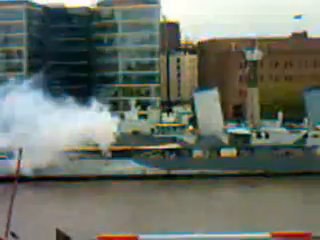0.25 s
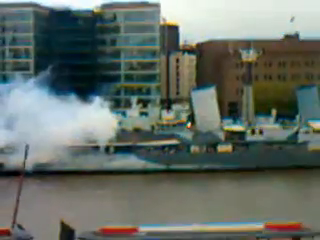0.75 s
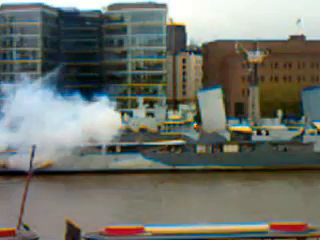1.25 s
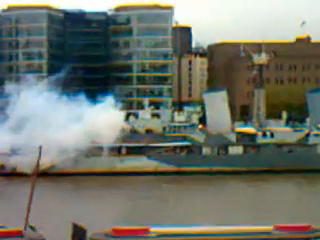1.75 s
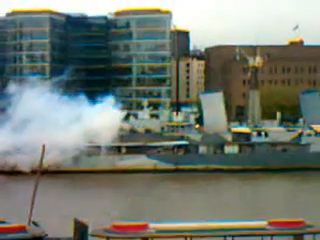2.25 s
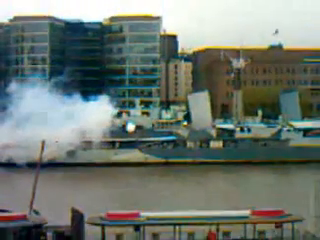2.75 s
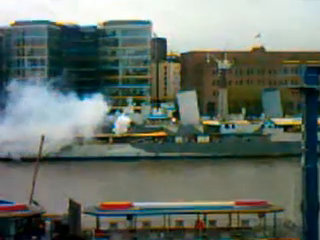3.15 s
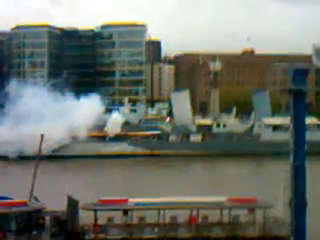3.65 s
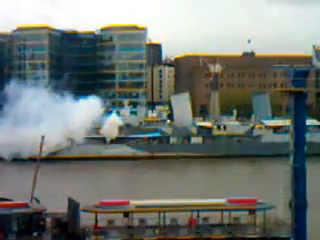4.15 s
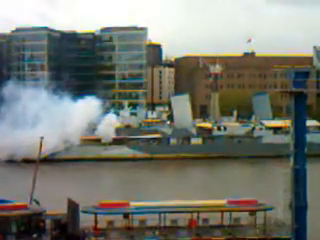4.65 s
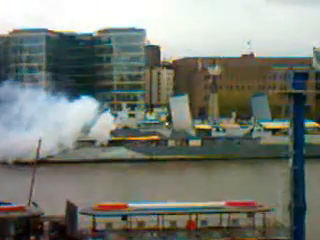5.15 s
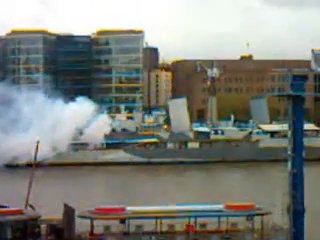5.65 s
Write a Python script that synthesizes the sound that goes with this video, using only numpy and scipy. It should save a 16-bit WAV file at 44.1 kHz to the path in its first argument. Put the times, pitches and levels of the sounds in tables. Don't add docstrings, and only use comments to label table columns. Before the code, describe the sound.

Two huge cannon booms, about three seconds apart, overload a small microphone and roll and crackle away between city buildings across a river.

```python
import sys
import numpy as np
from scipy import signal
from scipy.io import wavfile
from scipy.ndimage import uniform_filter1d, minimum_filter1d

SR = 44100
rng = np.random.default_rng(int(sys.argv[2]) if len(sys.argv) > 2 else 0)


def generate_wav(sig):
    pcm = np.round(np.clip(np.atleast_2d(sig).T, -1, 1) * 32767).astype(np.int16)
    wavfile.write(sys.argv[1], SR, pcm)


def voltage_ratio(decibels):
    exponent = np.asarray(decibels, float) / 20
    return 10 ** exponent


N = 260190


def unit(x):
    return x / np.sqrt(np.mean(x ** 2))


def resonate(x, hz, width_hz):
    return signal.lfilter(*signal.iirpeak(hz, hz / width_hz, fs=SR), x)


def dull(x, hz):
    return signal.sosfilt(signal.butter(6, hz, fs=SR, output="sos"), x)


def curve(rows, column):
    rows = np.asarray(rows)
    return np.interp(np.arange(N) / SR, rows[:, 0], rows[:, column])


# [t/s, level/dB]
TRAFFIC_HISS = [(0, -56.5), (.15, -65), (.3, -71), (.6, -77), (2.75, -71), (2.9, -64), (3.3, -69),
                (3.45, -63), (3.6, -66), (5.2, -68.5), (5.45, -72), (5.9, -68.5)]


def city_hiss():
    noise = resonate(rng.standard_normal(N), 2600, 1600)
    return voltage_ratio(curve(TRAFFIC_HISS, column=1)) * unit(dull(noise, 3400))


# [t/s, f/Hz, peak level/dB, rise/s, t60/s]
KNOCKS = [(2.1022, 470, -9, .0016, .013), (2.1025, 1470, -18.5, 0.0017, .015),
          (2.1028, 760, -25, .001, .012), (2.1092, 399, -10.5, 0.0066, 0.018),
          (2.111, 717, -26.5, .003, 0.051), (2.519, 171.4, -19.5, .0015, 0.23),
          (2.824, 380, -32, 0.0011, 0.042), (3.3874, 2080, -18, 0.00045, .011),
          (4.737, 350, -34, 0.0012, .008), (5.487, 109, -30, 0.0081, .2), (5.503, 259, -23, 0.0033, .069),
          (5.535, 240.7, -24, .0028, .22)]


def knocks():
    out = np.zeros(N)
    t = np.arange(SR // 4) / SR
    for start, hz, db, rise, t60 in KNOCKS:
        attack = np.sin(np.pi / 2 * np.clip(t / rise, 0, 1)) ** 2
        decay = voltage_ratio(-60 * np.maximum(t - rise, 0) / t60)
        out[int(start * SR):][:len(t)] += voltage_ratio(db) * attack * decay * np.sin(2 * np.pi * hz * t)
    return out


def add_burst(out, start, hz, db, width_hz, t60, shock):
    t = np.arange(SR // 4) / SR
    push = rng.standard_normal(len(t))
    push[0] = shock
    push = push * voltage_ratio(-60 * t / t60)
    burst = resonate(resonate(push, hz, width_hz), hz, 2 * width_hz)
    out[int(start * SR):][:len(t)] += voltage_ratio(db) * burst / np.abs(burst).max()


# [t/s, f/Hz, peak level/dB, width/Hz, t60/s]
SNAPS = [(.6235, 2500, -17, 1800, .12), (.647, 1470, -11, 460, 0.15), (2.1025, 700, -22.5, 298, 0.068),
         (2.8232, 1400, -15.5, 1300, .068), (2.8236, 2620, -24, 1100, .04),
         (2.8252, 3650, -17.5, 610, .013), (2.8352, 1500, -31, 900, .16), (3.3875, 1980, -22.5, 460, 0.061),
         (3.389, 790, -21, 790, 0.066), (3.6103, 1500, -24, 2000, 0.056), (3.638, 1600, -15, 458, .1),
         (3.617, 2000, -14, 2000, .055), (3.968, 1400, -20.5, 250, .07), (4.06, 2900, -42, 1200, .4),
         (3.39, 3420, -34, 159, 0.042)]


def snaps():
    out = np.zeros(N)
    for row in SNAPS:
        add_burst(out, *row, shock=6.5)
    return out


# [delay t/s, f/Hz, peak level/dB]
RINGING_FRONTS = [
    (.586, 1130, -18),
    (.585, 1700, -25),
    (1.833, 1650, -35),
]
# [t/s, f/Hz, peak level/dB]
BLIPS = [(3.388, 240, -25), (4.345, 1300, -30), (4.905, 1435, -41), (5.09, 1300, -40), (5.207, 1330, -38),
         (5.469, 1550, -32), (5.487, 1290, -28.5), (5.485, 510, -26.5)]


def blips():
    out = np.zeros(N)
    rung = [(shot + delay, hz, db) for shot in SHOTS_S[1:] for delay, hz, db in RINGING_FRONTS]
    for row in rung + BLIPS:
        add_burst(out, *row, width_hz=150, t60=.085, shock=6.)
    return out


SHOTS_S = [
    -2.366,
    .622,
    3.611,
]
# [delay t/s, level/dB, bass over crack/dB, t60/s]
FRONTS = [(0.0, -14.5, 14, 0.17), (0.008, -7, -2.5, 0.47), (0.05, -23, 36, 0.37), (0.164, -23, 29.5, 0.21),
          (0.195, -29.5, 13, 1.49), (0.251, -36.5, 27, 0.52), (0.344, -30.5, 9.5, 1.48),
          (0.468, -44, 27.5, 0.62), (0.572, -25.5, 7, 0.4), (0.67, -40.5, 14.5, 1.01),
          (0.756, -34, -8.5, 0.91), (0.943, -39.5, -0.7, 1.21), (1.05, -37.5, 16, 0.6),
          (1.094, -31.5, 5, 0.51), (1.168, -33, -1, 0.36), (1.28, -35, -9.5, 0.47),
          (1.406, -38.5, -10, 0.32), (1.466, -33.5, -10, 0.24), (1.569, -50.5, 14, 1.06),
          (1.834, -28, 9, 0.17), (1.86, -37, 16.5, 0.68), (1.998, -72.2, 31, 1.57),
          (2.333, -52, 21.5, 0.51), (2.537, -63, -2.7, 2.4)]
# [t/s, level/dB, bass over crack/dB, t60/s]
STRAYS = [(0.013, -57.5, 22.5, 1.6), (0.056, -63, 23.2, 1.52), (0.878, -32, 21, 1.37),
          (1.269, -38, 12, 2.4), (1.398, -39.5, 27.5, 0.55), (1.622, -43, 29.5, 0.44),
          (1.718, -58, 29.5, 4.6), (1.881, -31, 19, 0.33), (1.958, -39, 17, 0.67),
          (2.045, -32.5, 13.5, 0.6), (2.192, -25.5, 2.2, 0.27), (2.288, -47.5, 29, 0.31),
          (2.64, -57.5, 26, 1.2), (2.833, -51, 18.5, 1.7), (3.042, -65, 37.5, 0.44),
          (3.189, -67.2, 37.5, 0.53), (3.265, -60.5, 36, 0.18), (3.422, -60, 20.0, 3.4),
          (3.961, -24, 18.5, 0.18), (4.334, -52, 35, 0.7), (4.399, -39.5, 27, 0.25),
          (4.52, -49.0, 30.5, 0.52), (4.721, -45.7, 31.5, 0.16), (4.763, -67.5, 37.5, 1.89),
          (5.121, -63.6, 36.8, 0.33), (5.478, -32.5, 11.5, 0.2), (5.681, -62.3, 38, 0.13),
          (5.762, -55.5, 18, 1.2)]
PARTS = {"boom": (0.14, 1.0184, 0.02, 0.7559, -51.5), "body": (-1.53, 0.3956, 0.02, 1.0464, -66.5),
         "crack": (0.08, .01, 0.0186, 1.01, -80.5), "edge": (-8.6, 0.3459, .018, .8, -85.5)}
AIR_LOSS_DB, AIR_LOSS_S, AIR_KNEE = -21.5, .66, 2.4


def roll(part):
    offset_db, bass_share, rise, stretch, floor_db = PARTS[part]
    t = np.arange(0, N, 32) / SR
    answers = [(shot + delay, *rest) for shot in SHOTS_S for delay, *rest in FRONTS]
    start, db, bass_db, t60 = np.array(answers + STRAYS).T[:, :, None]
    since = np.maximum(t - start, 0)
    level_db = db + offset_db + bass_share * bass_db - 60 * since / (stretch * t60)
    gain = (1 - np.exp(-since / rise)) * voltage_ratio(level_db)
    gain = np.sqrt(np.sum(gain ** 2, axis=0))
    if part == "edge":
        since_shot = t - np.array(SHOTS_S)[np.searchsorted(SHOTS_S, t) - 1]
        gain = gain * voltage_ratio(AIR_LOSS_DB * (1 - np.exp(-(since_shot / AIR_LOSS_S) ** AIR_KNEE)))
    return np.interp(np.arange(N) / SR, t, np.hypot(gain, voltage_ratio(floor_db)))


def echoes():
    per_s, spread_db = 2500, 2.5
    arrive = rng.random(N) < per_s / SR
    strength = voltage_ratio(spread_db * np.minimum(rng.exponential(size=N), 3.5))
    return arrive * rng.choice([-1, 1], N) * strength


def patches():
    depth_db, per_s = 1.1, 22
    size = int(SR / per_s)
    steps = np.repeat(rng.standard_normal(200), size)[:N]
    return voltage_ratio(depth_db * 1.37 * uniform_filter1d(steps, size // 2))


def band(modes, even_s, evenness):
    y = np.zeros(N)
    for hz, width_hz, db in modes:
        once = resonate(echoes(), hz, 1.2 * width_hz)
        y += voltage_ratio(db) * resonate(once, hz, 1.2 * width_hz)
    y = unit(y)
    slow_power = uniform_filter1d(y ** 2, int(even_s * SR)) + 0.1
    return unit(patches() * y / slow_power ** (evenness / 2))


# [f/Hz, width/Hz, level/dB]
BOOM = [
    (134.6, 61.5, 2),
    (75.2, 26, -5),
]


def boom(head_on):
    gain = roll("boom")
    rumble = voltage_ratio(-34) * unit(resonate(rng.standard_normal(N), 35, 30))
    return gain * (voltage_ratio(-12 * head_on) * band(BOOM, 0.071, 0.42) + rumble)


# [f/Hz, width/Hz, level/dB]
BODY = [
    (261, 88, 6),
    (340, 20, -16),
    (485, 270, -10.5),
]


def body():
    return roll("body") * band(BODY, 0.062, 0.28)


# [f/Hz, width/Hz, level/dB]
CRACK = [
    (1208, 600, 4),
    (1514, 384, 2.5),
    (785, 53, 1),
    (1885, 130, -11),
]


def crack():
    return roll("crack") * dull(band(CRACK, 0.023, 0.46), 2060)


# [f/Hz, width/Hz, level/dB]
EDGE = [
    (2400, 1500, -4),
    (3162, 260, -2),
]


def edge():
    shoulder = dull(band(EDGE, 0.024, 0.36), 3100)
    above = voltage_ratio(-19) * band([(3860, 5800, 0)], .03, .2)
    return roll("edge") * (shoulder + above)


HEAD_S = [
    .6235,
    3.611,
]
# [t/s, f/Hz, level/dB]
HEAD = [
    [(0.63, 136.2, 0.5), (0.662, 137.4, -12), (0.694, 160.5, 11), (0.71, 150.2, -16.5),
     (0.736, 142.3, -8.5), (0.83, 137, -11.5), (0.87, 139, -17)],
    [(3.62, 137, 4.5), (3.652, 139.1, -17), (3.678, 156.5, -4.5), (3.692, 158.5, -18), (3.754, 160.8, -9),
     (3.812, 152.5, -13), (3.87, 164, -15.5)],
]


def head():
    top, rise_s, full_swing_s, octave_db = .84, .011, .105, -14.5
    t, out, on = np.arange(N) / SR, np.zeros(N), np.zeros(N)
    wander = unit(uniform_filter1d(uniform_filter1d(rng.standard_normal(N), 400), 400))
    for start, rows in zip(HEAD_S, HEAD):
        gate = np.clip((t - start) / rise_s, 0, 1) * np.clip((rows[-1][0] - t) / 0.045, 0, 1)
        hz = curve(rows, column=1) * (1 + .015 * wander)
        phase = 2 * np.pi * np.cumsum(hz * (gate > 0)) / SR
        swing = np.minimum(np.sqrt(2) * voltage_ratio(curve(rows, column=2)), top - .12)
        swing = uniform_filter1d(np.where(t < start + full_swing_s, top, swing), size=600)
        out -= gate * swing * (np.cos(phase) - voltage_ratio(octave_db) * np.cos(2 * phase))
        on += gate
    return out, on


def gun():
    ring, head_on = head()
    return ring + boom(head_on) + body() + crack() + edge()


def scene():
    return (city_hiss() + knocks() + snaps() + blips() + gun())[None]


def limit(x):
    ceiling, grip = .96, .45
    peak = uniform_filter1d(-minimum_filter1d(-np.abs(x), size=400), size=400)
    return x * np.minimum(ceiling / (peak + 1e-9), 1) ** grip


def band_limit(x):
    return signal.sosfilt(signal.butter(12, 15850, fs=SR, output="sos"), x)


def record(dry):
    thin = signal.sosfilt(signal.butter(2, 42, "high", fs=SR, output="sos"), dull(dry, 4500))
    narrow = signal.sosfilt(signal.ellip(8, .5, 70, 4850, fs=SR, output="sos"), thin)
    overloaded = np.clip(limit(narrow), -.98, .98)
    faint_noise = voltage_ratio(-97) * rng.standard_normal(narrow.shape)
    return band_limit(overloaded + faint_noise)


dry = scene()
out = record(dry)
generate_wav(out)
```